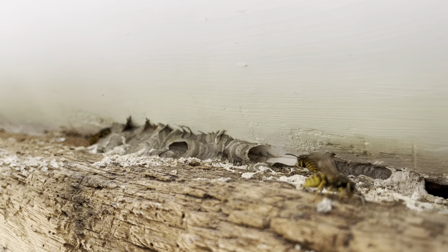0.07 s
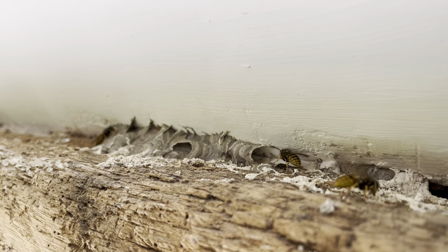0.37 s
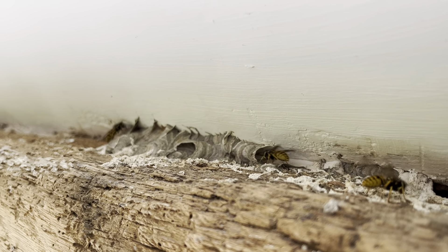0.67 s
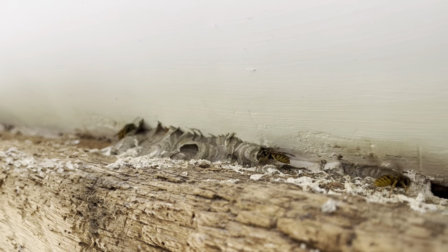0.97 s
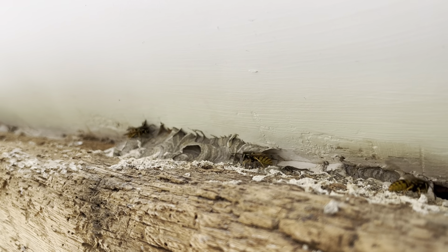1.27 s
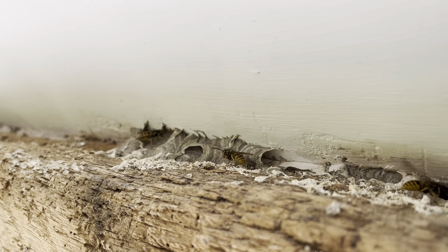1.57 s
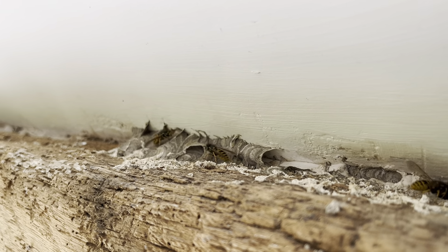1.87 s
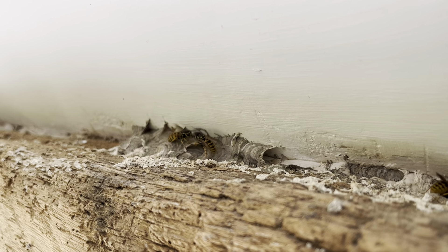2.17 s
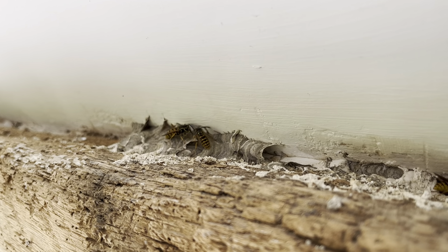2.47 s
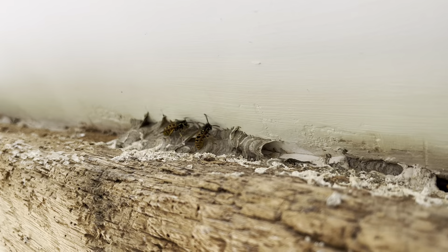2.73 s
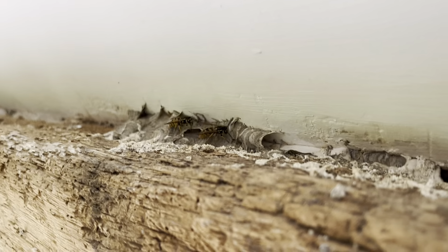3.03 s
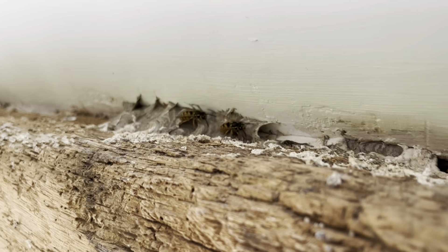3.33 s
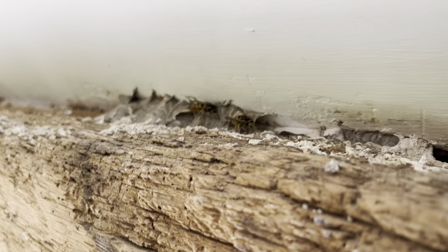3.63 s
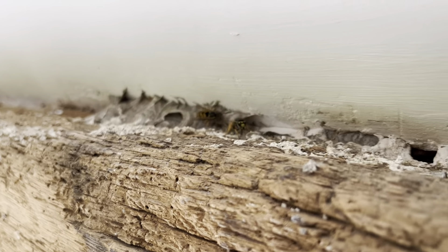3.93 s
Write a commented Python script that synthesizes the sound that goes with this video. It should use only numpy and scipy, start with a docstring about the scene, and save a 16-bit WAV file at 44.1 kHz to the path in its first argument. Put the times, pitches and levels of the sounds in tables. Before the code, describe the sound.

Faint, close crackling and pattering comes from wasps on a paper nest in a quiet room with a low hum. Wings flutter softly at first, the ticking goes on, and something knocks sharply on wood once near the end.

```python
"""Wasps walk over a papery nest on a wooden beam, close to a small stereo microphone in a quiet room.
From the start, over room rumble and mains hum, legs and jaws make dry ticks, crackle and short scrapes.
Wings flutter softly in the first second; then feet patter on the wood for half a second.
Near 3.3 s something knocks once, scraping and ringing the wood, amid soft bumps and a faint rustle."""
import sys
import numpy as np
from scipy import signal
from scipy.fft import rfft, irfft
from scipy.io import wavfile
from scipy.ndimage import uniform_filter1d

SR = 44100
rng = np.random.default_rng(int(sys.argv[2]) if len(sys.argv) > 2 else 0)


def wav_record(signal):
    """Record a signal, one row per channel, as 16-bit PCM in the file named by sys.argv[1]."""
    frames = np.transpose(np.atleast_2d(signal))
    bounded = np.clip(frames, -1, 1)
    # unit amplitude maps onto the largest positive 16-bit level
    quanta = np.round(bounded * 32767).astype(np.int16)
    wavfile.write(sys.argv[1], SR, quanta)


N = 176400
TIME_S = np.arange(N) / SR


def undb(db):
    return 10 ** (np.asarray(db) / 20)


def unit(x):
    """Scale to rms 1."""
    return x / np.sqrt(np.mean(x ** 2))


def curve(rows):
    """Gain over time from (time [s], level [dB]) points."""
    return undb(np.interp(TIME_S, *np.array(rows).T))


def arch(start_s, length_s):
    """Half-sine envelope."""
    return np.sin(np.pi * np.clip((TIME_S - start_s) / length_s, 0, 1))


def drift(rate_hz):
    """Smooth random drift, rms 1."""
    span = int(SR / rate_hz)
    smoothed = uniform_filter1d(rng.standard_normal(N), span, mode="wrap")
    return unit(uniform_filter1d(smoothed, span, mode="wrap"))


def add(track, start_s, sound):
    """Mix a sound into a track."""
    i = int(start_s * SR)
    track[..., i:i + sound.shape[-1]] += sound[..., :N - i]


def pan(left_over_right_db):
    """Left and right gains."""
    return undb(np.array([[left_over_right_db], [-left_over_right_db]]) / 2)


def colour(x, points):
    """Minimum-phase filter of unit energy, shaped by (frequency [Hz], gain [dB]) points."""
    hz, db = np.array(points).T
    gain = unit(undb(np.interp(np.log(np.fft.rfftfreq(N, 1 / SR) + 1), np.log(hz), db)))
    cepstrum = irfft(np.log(gain), N)
    cepstrum[1:N // 2] *= 2
    cepstrum[N // 2 + 1:] = 0
    return irfft(rfft(x) * np.exp(rfft(cepstrum)), N)


def resonance(x, hz, width, stages=1):
    """Two-pole band-passes in series; width is a share of the centre."""
    for _ in range(stages):
        x = signal.lfilter(*signal.iirpeak(hz, 1 / width, fs=SR), x)
    return x


def snap(spray_db, decay_s):
    """One sharp break, then a dying spray of smaller ones."""
    t = np.arange(1024) / SR
    spray = rng.standard_normal(len(t)) ** 3 * np.exp(-t / decay_s)
    return (t == 0) + undb(spray_db) * spray / np.linalg.norm(spray)


def patter(contacts_per_s, spread_db=3.7, friction_db=-7):
    """Tiny contacts, a few much stronger than the rest, over smooth friction."""
    hit = rng.random(N) < contacts_per_s / SR
    size = undb(spread_db * np.minimum(rng.exponential(size=N), 4))
    contacts = unit(hit * size * np.sign(rng.standard_normal(N)))
    return contacts + undb(friction_db) * rng.standard_normal(N)


def ringing_patter(hz):
    """Footfalls exciting one resonance of a surface."""
    return resonance(patter(contacts_per_s=170), hz, width=.2, stages=2)


# left port's lead over the right: (frequency [Hz], phase [rad])
PORT_PHASE = [(0, 0), (1120, 2.1), (1980, 6.3), (2930, 7.1), (4650, 6.8), (5080, 6.1), (5770, 3.9),
              (6630, 3.0), (8440, 0.1), (9560, -0.2), (12100, -2.8), (13400, -3.5), (15600, -6.2),
              (16500, -6.1)]

def ports(x):
    """A close sound reaches the two microphone ports out of step."""
    lead_rad = np.interp(np.fft.rfftfreq(N, 1 / SR), *np.array(PORT_PHASE).T)
    shift = np.exp(.5j * np.array([lead_rad, -lead_rad]))
    return irfft(rfft(x) * shift, N) * pan(1)


# room spectrum: (frequency [Hz], relative density [dB])
ROOM_COLOUR = [(20, -27.5), (32, -11.5), (45, 0.5), (70, 6), (115, 3), (180, -3), (280, -3), (400, -8),
               (550, -14), (750, -23.5), (1100, -34), (2000, -45.5), (4000, -43.5), (9000, -56),
               (16000, -77)]

def room(level_db=-56, pan_db=-4):
    """Low rumble with a trace of hiss, partly shared by both channels."""
    air = rng.standard_normal(N) + rng.standard_normal((2, N))
    return unit(colour(air, ROOM_COLOUR)) * undb(level_db) * pan(pan_db)


# mains partials: (frequency [Hz], left level [dB], right level [dB], end [s])
HUM_PARTIALS = [(100.04, -57, -51, 9), (150.06, -59.5, -49.3, 3.13)]

def hum(waver_db=.64, fade_s=.11):
    """Mains hum, stronger on the right; the upper partial stops shortly before the knock."""
    out = 0
    for hz, left_db, right_db, end_s in HUM_PARTIALS:
        tone = np.sqrt(2) * np.sin(2 * np.pi * hz * TIME_S)
        gate = np.clip((end_s - TIME_S) / fade_s + .5, 0, 1)
        out += undb([[left_db], [right_db]]) * tone * gate * undb(waver_db * drift(6.8))
    return out


# rubbing envelope: (time [s], level [dB])
RUSTLE_LEVEL = [(0, -75.5), (.36, -76.5), (.46, -65.5), (.58, -75.5), (3.2, -73.5), (3.245, -54),
                (3.29, -67.5), (3.35, -57), (3.42, -68.5), (3.5, -61.5), (3.57, -72), (3.66, -65),
                (3.81, -75.5), (3.88, -63), (4, -71)]
# rubbing spectrum: (frequency [Hz], relative density [dB])
RUBBING_COLOUR = [(200, -6), (450, 6), (900, -2.5), (1500, -13), (2200, -14.5), (5000, -25.5)]

def rustle(contacts_per_s=800):
    """Dull, grainy rubbing, mostly around the knock."""
    shared, left, right = (patter(contacts_per_s) for _ in range(3))
    grains = shared + np.array([left, right])
    return unit(colour(grains, RUBBING_COLOUR)) * curve(RUSTLE_LEVEL)


# low thumps: (time [s], peak level [dB])
LOW_THUMPS = [(3.111, -45), (3.338, -36), (3.676, -41.5)]

def thumps(start_hz=145.7, end_hz=63.6, sag_s=.027, rise_s=.01):
    """Low thumps with the knock and two bumps; each swells briefly and sinks in pitch."""
    t = np.arange(SR // 4) / SR
    swell = t / rise_s * np.exp(1 - t / rise_s)
    hz = end_hz + (start_hz - end_hz) * np.exp(-t / sag_s)
    thump = swell * np.sin(2 * np.pi * np.cumsum(hz) / SR)
    out = np.zeros(N)
    for start_s, db in LOW_THUMPS:
        add(out, start_s, undb(db) * thump)
    return out


# contacts on the wood: (time [s], thud level [dB], tilt [dB/octave], click level [dB])
WOOD_CONTACTS = [(2.9231, -49, 4, -69), (3.108, -42.5, -1, -56), (3.235, -45, -11.5, -62),
                 (3.249, -42, 0.5, -36), (3.3222, -25, -4, -33), (3.3244, -25, -13, -28.5),
                 (3.3268, -23, -9, -24.5), (3.3318, -25.5, 3, -14.5), (3.3427, -33, 2, -28),
                 (3.3442, -29, -6, -27), (3.46, -46, -2.5, -60), (3.67, -50.5, 2, -43),
                 (3.718, -44.5, -4, -51)]
# modes of the wood: (frequency [Hz], gain [dB])
WOOD_MODES = [(171, -12), (275, -8.5), (399, -2), (481.7, 1), (615, -24), (886, -15.5), (1090, -13),
              (1260, -10), (1420, -11), (1690, -13)]
# click spectrum: (frequency [Hz], relative density [dB])
CONTACT_COLOUR = [(1000, 6.5), (2300, -28), (3100, 0), (4000, 0.5), (5500, 0.5), (7300, -7), (8700, 7),
                  (9800, 5.5), (11200, -29), (12700, 1), (15000, -15)]

def knock(low_t60_s=.042, knee_hz=650, attack_s=.00085, pivot_hz=420, skew_rad=.59):
    """Contacts click and ring the wood: a quick cluster is the knock, the rest are soft bumps."""
    t = np.arange(SR // 4) / SR
    attack = 1 - np.exp(-t / attack_s)
    body, clicks = np.zeros((2, N)), np.zeros(N)
    for start_s, thud_db, tilt_db_per_octave, click_db in WOOD_CONTACTS:
        for k, (hz, mode_db) in enumerate(WOOD_MODES):
            t60_s = low_t60_s / np.hypot(1, hz / knee_hz)  # higher modes die sooner
            phase_rad = skew_rad * (-1) ** k * np.array([[1], [-1]])
            ring = np.sin(2 * np.pi * hz * t + phase_rad) * attack * undb(-60 * t / t60_s)
            level_db = thud_db + mode_db + tilt_db_per_octave * np.log2(hz / pivot_hz)
            pan_db = -np.log2(hz / WOOD_MODES[0][0])  # 1 dB rightward per octave
            add(body, start_s, ring * pan(pan_db) * undb(level_db))
        add(clicks, start_s, undb(click_db) * snap(spray_db=-34.5, decay_s=.0012))
    return body + ports(colour(clicks, CONTACT_COLOUR))


# wing flutters: (time [s], length [s], level [dB], centre [Hz])
WING_FLUTTERS = [(0.062, 0.052, -66, 497), (0.427, 0.11, -61.5, 326), (.8, 0.1, -65.5, 370)]

def wings():
    """Brief, soft wing flutters: narrow-band swells of low noise."""
    out = 0
    for start_s, length_s, db, hz in WING_FLUTTERS:
        air = unit(resonance(rng.standard_normal(N), hz, width=.22, stages=2))
        out += undb(db) * air * arch(start_s, length_s)
    return ports(out)


def feet_on_wood(start_s=1.14, end_s=1.66, level_db=-80.5, swell_db=5):
    """A wasp's feet on the wood: a duller, hollow patter."""
    taps = sum(ringing_patter(hz) for hz in (1700, 2200, 2800, 3600))
    taps *= undb(swell_db * drift(35))
    gate = (TIME_S > start_s) & (TIME_S < end_s)
    return ports(unit(taps)) * undb(level_db) * gate


# how busily the wasps move: (time [s], level [dB])
CRACKLE_LEVEL = [(0, -77), (.25, -81.5), (.42, -71.5), (.53, -78.5), (1.0, -77), (1.22, -74.5),
                 (1.58, -72.5), (1.69, -77), (1.9, -71), (2.2, -66.5), (2.35, -74), (2.7, -76.5),
                 (2.97, -70.5), (3.38, -68), (3.6, -70), (3.75, -72.5), (3.82, -83.5), (4, -69)]
# dry scrapes, feet on the paper and a louder one during the knock: (time [s], length [s], level [dB])
DRY_SCRAPES = [(0.405, 0.1, -93), (2.098, 0.024, -70), (2.204, 0.095, -64), (2.92, 0.15, -73.5),
               (3.32, 0.037, -54)]
# nest paper spectrum: (frequency [Hz], relative density [dB])
PAPER_COLOUR = [(700, -12.5), (1500, -3.5), (2300, -9), (3300, -6), (4400, -5), (5500, 0), (6700, 4),
                (8300, -1.5), (10500, 0), (12500, -0.5), (15500, -7.5)]

def crackle(wander_db=3, broadband_db=-3, flurry_db=3.5, scatter_cutoff_hz=3500):
    """Feet patter and scrape on the paper, each spot ringing briefly; a louder scrape joins the knock."""
    rings = sum(unit(ringing_patter(hz)) * np.sqrt(hz) * undb(wander_db * drift(25))
                for hz in np.geomspace(1700, 14000, 9))
    steps = unit(rings) + undb(broadband_db) * patter(contacts_per_s=200)
    drive = unit(steps * undb(flurry_db * drift(87))) * curve(CRACKLE_LEVEL)
    scrape_gain = sum(undb(db) * arch(start_s, length_s) for start_s, length_s, db in DRY_SCRAPES)
    drive += scrape_gain * unit(unit(rings) + rng.standard_normal(N))
    # stereo width: separate dull noise per channel follows the envelope
    envelope = np.sqrt(uniform_filter1d(drive ** 2, 128) + 1e-18)
    lowpass = signal.butter(1, scatter_cutoff_hz, fs=SR, output="sos")
    scatter = signal.sosfilt(lowpass, envelope * rng.standard_normal((2, N)))
    return ports(colour(drive, PAPER_COLOUR)) + colour(scatter, PAPER_COLOUR)


# breaking fibres: (time [s], snap level [dB], ring level [dB], ring pitch [Hz])
FIBRE_TICKS = [(0.101, -66, -73, 5000), (0.3202, -64, -76, 5200), (0.3509, -60, -67, 5800),
               (0.4076, -73, -66, 4000), (0.5882, -62, -82, 6000), (0.6189, -69, -66, 5000),
               (0.6246, -61, -77, 3000), (0.8928, -63, -72, 2900), (1.1725, -67, -66, 3900),
               (1.2133, -65, -77, 2000), (1.2265, -74, -64, 3600), (1.288, -76, -68, 3300),
               (1.3588, -67, -67, 4100), (1.4388, -66, -80, 5000), (1.473, -64, -60, 4200),
               (1.4772, -72, -66, 4800), (1.574, -72, -69, 2500), (1.6294, -60, -68, 3500),
               (1.7205, -59, -57, 5000), (1.9475, -68, -65, 5300), (2.1147, -65, -59, 5700),
               (2.2734, -64, -62, 5700), (2.3713, -72, -66, 3500), (2.5679, -57, -64, 4700),
               (2.598, -67, -68, 5900), (2.755, -74, -69, 3700), (2.7688, -62, -75, 6000),
               (2.8208, -66, -71, 4650), (2.869, -66, -70, 5600), (2.9345, -63, -65, 2900),
               (2.9728, -67, -64, 4200), (3.007, -64, -68, 6300),  (3.0193, -66, -69, 2500),
               (3.1339, -66, -67, 4000), (3.2138, -58, -64, 6000), (3.2318, -65, -62, 5500),
               (3.7462, -63, -66, 4050)]
# snap spectrum: (frequency [Hz], relative density [dB])
SNAP_COLOUR = [(2500, -20), (5500, -11), (7300, 0), (10500, 0), (15500, -5)]

def ticks(level_window_s=.0065):
    """Fibres snap under legs and jaws: a bright break and a papery ring that differs by spot."""
    snaps, rings = np.zeros(N), np.zeros((2, N))
    for start_s, snap_db, ring_db, hz in FIBRE_TICKS:
        add(snaps, start_s, undb(snap_db) * snap(spray_db=-7, decay_s=.001))
        shared, left, right = (snap(spray_db=0, decay_s=.0016) for _ in range(3))
        ring = resonance(shared + np.array([left, right]) / 2, hz, width=.35)
        add(rings, start_s, undb(ring_db) * np.sqrt(2) * ring / np.linalg.norm(ring))
    return np.sqrt(level_window_s * SR) * ports(colour(snaps, SNAP_COLOUR) + rings)


def scene():
    """Wasps, knock and room together."""
    wasps = ticks() + crackle() + wings() + feet_on_wood()
    return wasps + knock() + thumps() + rustle() + hum() + room()


def record(dry):
    """Band limit: 35 Hz to 16.3 kHz."""
    low_cut = signal.butter(2, 35, "high", fs=SR, output="sos")
    high_cut = signal.ellip(8, .2, 70, 16300, fs=SR, output="sos")
    return signal.sosfilt(high_cut, signal.sosfilt(low_cut, dry))


dry = scene()
out = record(dry)
wav_record(out)
```